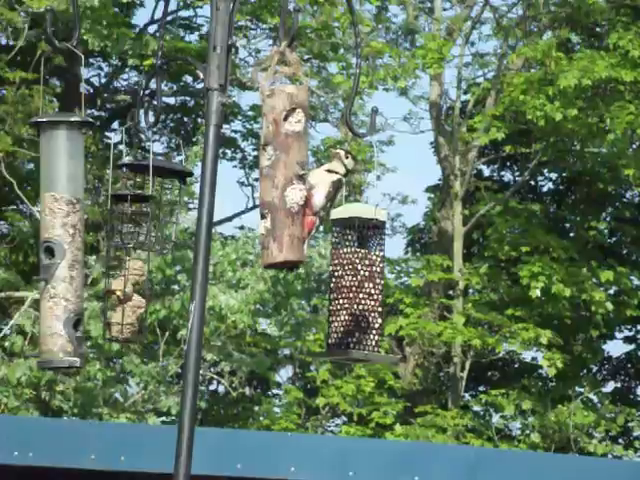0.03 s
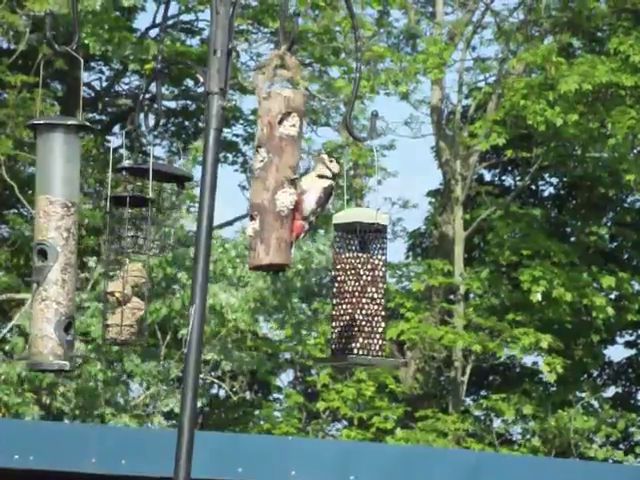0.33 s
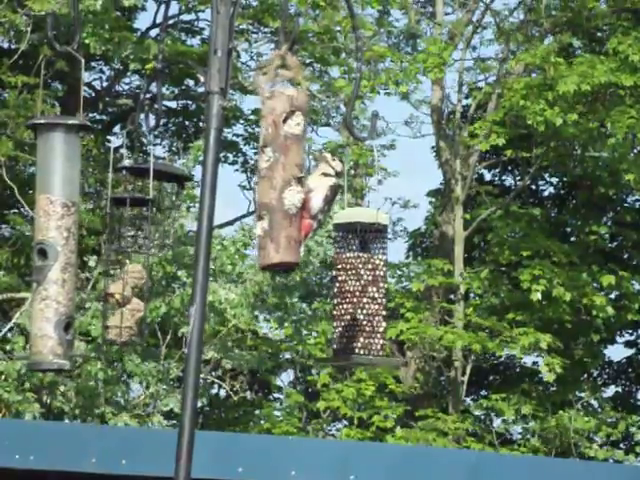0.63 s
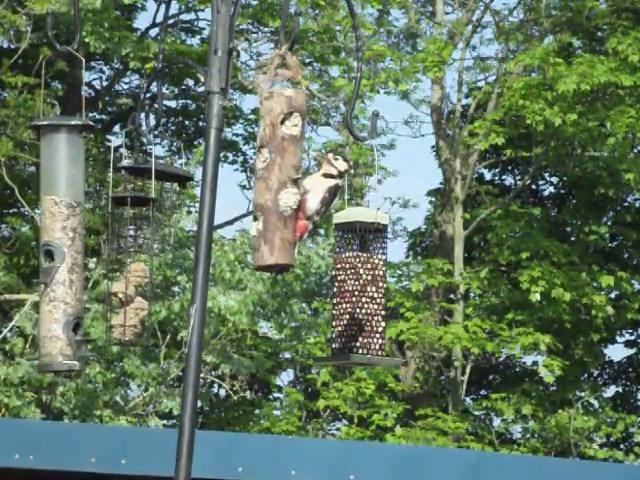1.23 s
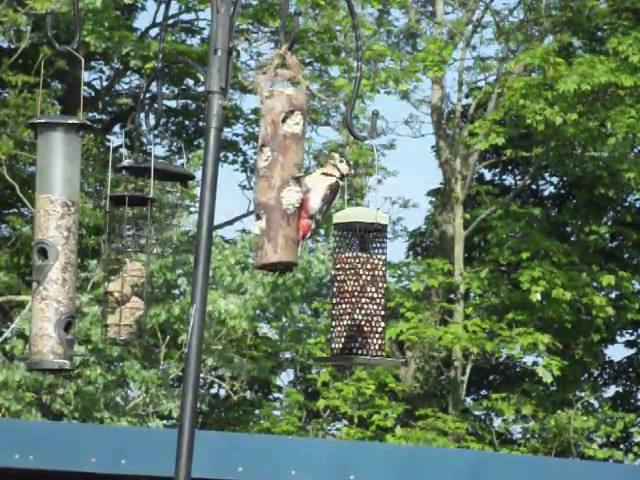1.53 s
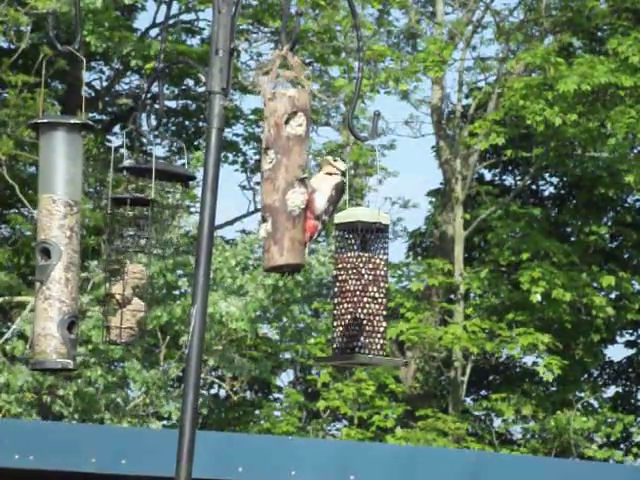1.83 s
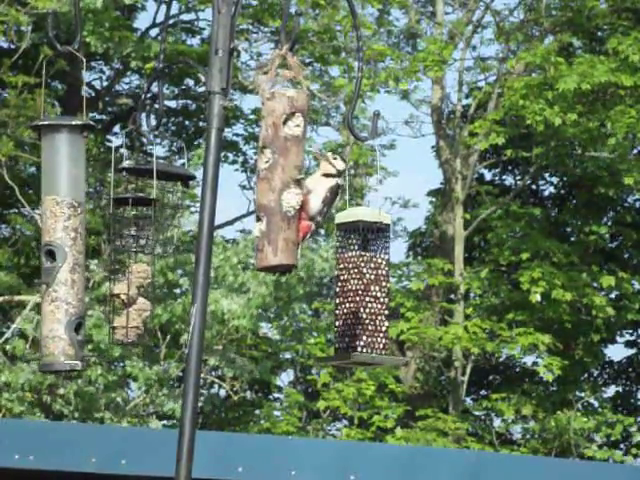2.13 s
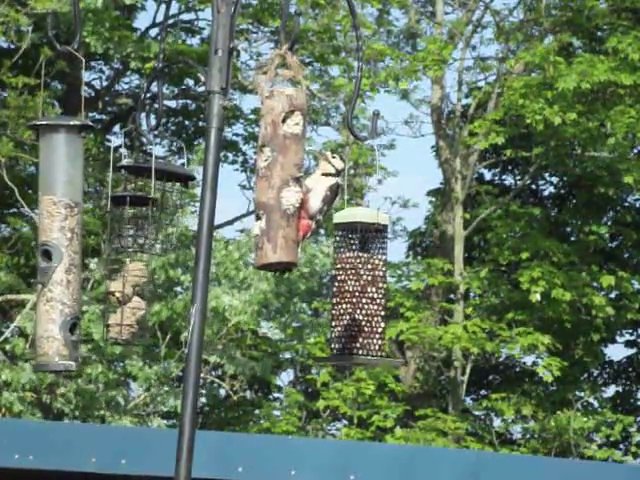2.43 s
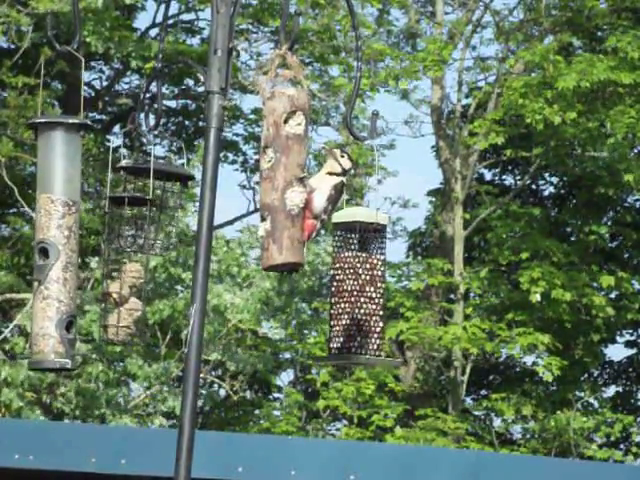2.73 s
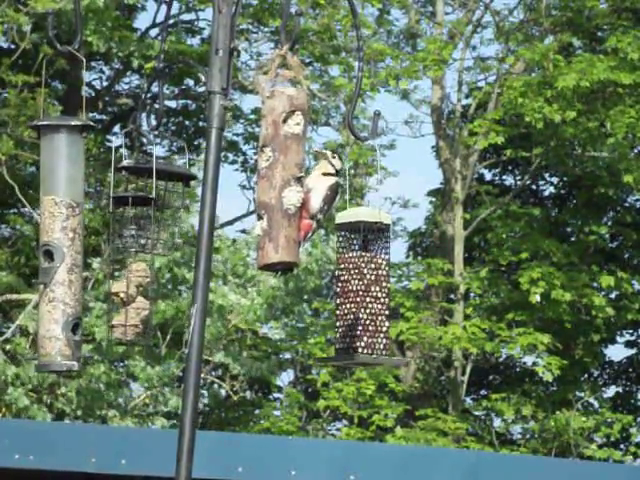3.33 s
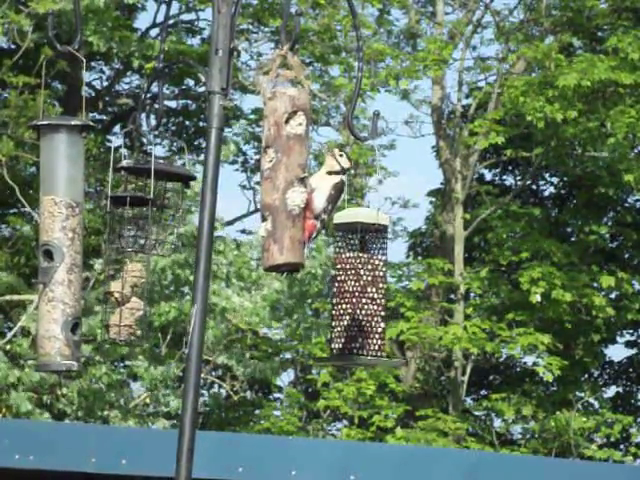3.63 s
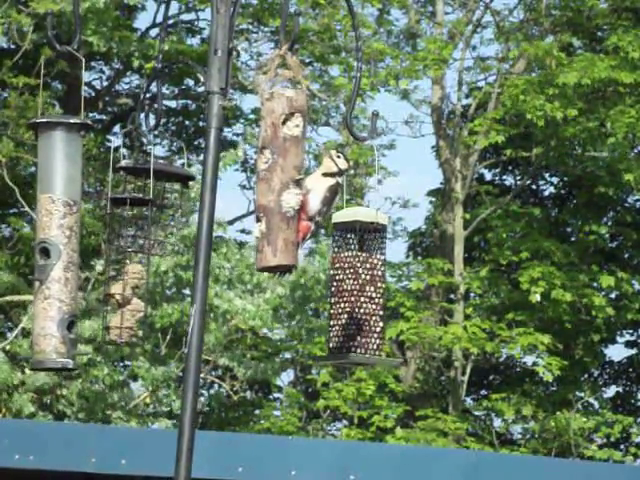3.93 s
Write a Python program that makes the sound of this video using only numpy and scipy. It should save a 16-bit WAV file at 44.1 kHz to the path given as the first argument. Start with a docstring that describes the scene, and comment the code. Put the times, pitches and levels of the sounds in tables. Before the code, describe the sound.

Steady, narrow hiss over a garden bird feeder, with early knocks and faint scratchy ticks.

```python
"""A soft pop and a faint whine as a small camera starts, then knocks and clicks on its plastic body.
Its narrow, ringing hiss covers the scene, a garden bird feeder. Two short runs of dry, scratchy ticks
follow, perhaps pecking: each a scrape ending in a snap. Underneath lie a low outdoor rumble and
a distant engine drone that swells late."""
import sys
import numpy as np
from scipy import signal
from scipy.fft import rfft, irfft
from scipy.io import wavfile
from scipy.ndimage import uniform_filter1d

SR = 44100
rng = np.random.default_rng(int(sys.argv[2]) if len(sys.argv) > 2 else 0)


def wav_record(signal):
    """Record a signal, one row per channel, as 16-bit PCM in the file named by sys.argv[1]."""
    frames = np.transpose(np.atleast_2d(signal))
    bounded = np.clip(frames, -1, 1)
    # unit amplitude maps onto the largest positive 16-bit level
    quanta = np.round(bounded * 32767).astype(np.int16)
    wavfile.write(sys.argv[1], SR, quanta)


N = 176400
TIME_S = np.arange(N) / SR
MIC_ON_S = 0.0362

# outdoor rumble: f/Hz, relative density/dB
RUMBLE_SPECTRUM = [(6, -4), (18, 5.5), (28, -1.5), (38, -11), (48, -13.5), (66, -8), (100, -17.5),
                   (180, -19), (260, -32), (500, -61)]
# engine drone: t/s, level/dB
DRONE_LEVELS = [(0.05, -42), (0.55, -51), (1.05, -45.5), (1.75, -53), (2.45, -53.5), (2.62, -44),
                (3.25, -39.5), (3.95, -45)]
# distant swells: t/s, length/s, f/Hz, width/Hz, level/dB
LOW_SWELLS = [(1.884, .26, 47.2, 8.9, -46), (2.058, 0.18, 158.4, 65, -45), (2.09, .65, 76.7, 19, -47),
              (2.1, 1.0, 145, 70, -55)]
# hiss: f/Hz, relative density/dB
HISS_SPECTRUM = [(120, -39.5), (210, -14), (480, -15), (750, -16), (1150, -13.5), (1700, -11), (2400, -9),
                 (2720, -7.5), (2900, -1), (3350, -0.5), (3600, -8), (3820, -17), (4250, -16),
                 (4550, -14.5), (5100, -22), (5500, -27), (5850, -38), (6150, -53.5), (6500, -75.5)]
# hiss: t/s, level/dB
HISS_LEVELS = [(0.04, -37.5), (0.9, -38), (1.9, -38), (2.8, -37.5), (3.95, -37.5)]
# microphone housing peaks and notches: f/Hz, width/Hz, gain/dB
HOUSING_RESONANCES = [(1168, 27, 3), (1285, 46, -4), (1323, 14, 4.5), (1625, 41, 4.5), (1995, 30, -2.5),
                      (2103, 70, 3.5), (2672, 42, -8), (3016, 70, 3), (3150, 36, -11.5), (3320, 70, 4),
                      (3520, 41, -1), (3604, 34, 4.5), (4053, 36, 7.5), (4200, 120, -3.5)]
# start-up whine: f/Hz, level/dB
WHINE_PARTIALS = [(555, -38.5), (1110, -45.5)]
# camera body: f/Hz, relative level/dB, t60/s
BODY_MODES = [(991, -23.5, 0.027), (1440, -33, 0.0086), (1805, -9, 0.01), (1850, -7, 0.0099),
              (2710, -10, 0.0027), (2998, 6, 0.0072), (3200, -8, 0.0072), (4480, -42, 0.0093),
              (5230, -26, .006)]
# contacts on the body: t/s, ring/dB, thud/dB
BODY_KNOCKS = [(0.0781, -22.5, -23), (0.1771, -21, -16.5), (.1790, -14, -37), (0.1828, -18, -34),
               (0.1851, -16.5, -40), (0.2732, -4.5, -28.5), (0.2755, -5.5, -34)]
# ticks: snap t/s, scrape length/s, scrape/dB, snap/dB, rub/dB
TICK_STROKES = [(0.351, 0.016, -38, -29, -43.5), (0.438, .003, -32, -25, -40.5),
                (.535, .011, -31, -22, -41.5), (.542, 0.0033, -34.5, -22, -46),
                (0.632, 0.0068, -32, -26, -42), (.683, 0.014, -44, -47, -36),
                (.7215, 0.021, -30.5, -16.5, -39.5), (1.0565, 0.0071, -32, -26, -42),
                (1.1474, 0.0074, -32, -24, -39), (1.2385, 0.0026, -31, -22, -42),
                (1.248, .003, -34, -21, -42), (1.3452, 0.0034, -36, -21, -43.5),
                (1.365, 0.014, -35, -18, -41)]
# bright scrape: f/Hz, relative density/dB
SCRAPE_SPECTRUM = [(800, -30), (2500, -12.5), (3000, -2), (3350, 11), (3750, -6.5), (4050, -2.5),
                   (4450, -12.5), (5200, -19.5), (5900, -36), (6400, -65)]
# dull rub: f/Hz, relative density/dB
RUB_SPECTRUM = [(200, -11.5), (700, -15.5), (1100, 0), (1450, -5), (2000, 1.5), (2600, -6.5), (4000, -29),
                (6000, -64.5)]


def amp(db):
    """dB to gain."""
    return 10 ** (np.asarray(db) / 20)


def unit_rms(x):
    """Scale to rms 1."""
    return x / np.sqrt(np.mean(x ** 2) + 1e-20)


def envelope(levels):
    """Per-sample gain from (t/s, level/dB) points."""
    return amp(np.interp(TIME_S, *np.transpose(levels)))


def shaped_noise(spectrum):
    """Noise, rms 1; spectrum interpolated over log frequency."""
    hz, db = np.transpose(spectrum)
    f_hz = np.fft.rfftfreq(N, 1 / SR)
    gain = amp(np.interp(np.log(f_hz + 1), np.log(hz + 1), db))
    return unit_rms(irfft(rfft(rng.standard_normal(N)) * gain, N))


def band_noise(centre_hz, width_hz):
    """Noise, rms 1, in a Gaussian band."""
    f_hz = np.fft.rfftfreq(N, 1 / SR)
    gain = np.exp(-2 * ((f_hz - centre_hz) / width_hz) ** 2)
    return unit_rms(irfft(rfft(rng.standard_normal(N)) * gain, N))


def add(mix, start_s, sound):
    """Mix in place at start_s."""
    part = mix[max(round(start_s * SR), 0):][:len(sound)]
    part += sound[:len(part)]


def outdoor_rumble(bed_db=-43):
    """Steady low noise plus soft, distant narrow-band swells."""
    out = amp(bed_db) * shaped_noise(RUMBLE_SPECTRUM)
    for start_s, length_s, hz, width_hz, db in LOW_SWELLS:
        arch = np.sin(np.pi * np.clip((TIME_S - start_s) / length_s, 0, 1))
        out += amp(db) * arch * band_noise(hz, width_hz)
    return out


def engine_drone(pitch_hz=55.8, wander_rms=0.008):
    """Distant engine: one low, wavering tone."""
    hz = pitch_hz * (1 + wander_rms * band_noise(0, width_hz=4.3))
    return envelope(DRONE_LEVELS) * unit_rms(np.sin(2 * np.pi * np.cumsum(hz) / SR))


def hiss(flicker_db=0.72, patch_s=0.055, patch_hz=350, rise_s=0.017):
    """Hiss ringing in the microphone housing; fades in, flickers slightly in time-frequency patches."""
    f_hz = np.fft.rfftfreq(N, 1 / SR)
    housing_db = sum(db * np.exp(-((f_hz - hz) / width_hz) ** 2)
                     for hz, width_hz, db in HOUSING_RESONANCES)
    ringing = irfft(rfft(shaped_noise(HISS_SPECTRUM)) * amp(housing_db), N)
    bins_hz, frames_s, spectra = signal.stft(ringing, SR, nperseg=1024, noverlap=768)
    patches = uniform_filter1d(rng.standard_normal(spectra.shape), round(patch_hz / bins_hz[1]), axis=0)
    patches = unit_rms(uniform_filter1d(patches, round(patch_s / frames_s[1]), axis=1))
    spectra *= amp(flicker_db * patches)
    flickering = signal.istft(spectra, SR, nperseg=1024, noverlap=768)[1][:N]
    fade_in = np.clip((TIME_S - MIC_ON_S) / rise_s, 0, 1)
    return fade_in * unit_rms(flickering) * envelope(HISS_LEVELS)


def whine(half_length_s=0.03):
    """Faint, brief tone as the camera starts."""
    gate = np.exp(-((TIME_S - MIC_ON_S) / half_length_s) ** 8)
    return gate * sum(amp(db) * np.sin(2 * np.pi * hz * TIME_S) for hz, db in WHINE_PARTIALS)


def knocks(contact_s=0.00095, rattle_db=-16.5, rattle_decay_s=0.0073):
    """Each contact rings and rattles the plastic body; its thud sets the whole camera booming."""
    thud_hz, thud_decay_s = 233, 0.00065
    boom_hz, boom_decay_s, boom_re_thud_db = 116, 0.029, -21
    t = np.arange(SR // 10) / SR
    ring = sum(amp(db - 60 * t / t60_s) * np.sin(2 * np.pi * hz * t) for hz, db, t60_s in BODY_MODES)
    ring *= 1 - np.exp(-(t / contact_s) ** 2)
    ring /= abs(ring).max()
    thud = -np.sin(2 * np.pi * thud_hz * t) * np.exp(1 - t / thud_decay_s)
    boom = amp(boom_re_thud_db) * np.sin(2 * np.pi * boom_hz * t) * np.exp(-t / boom_decay_s)
    out = np.zeros(N)
    for start_s, ring_db, thud_db in BODY_KNOCKS:
        body_noise = unit_rms(signal.fftconvolve(rng.standard_normal(len(t)), ring)[:len(t)])
        rattle = amp(rattle_db) * body_noise * np.exp(-t / rattle_decay_s)  # dB re ring peak
        add(out, start_s, amp(ring_db) * (ring + rattle) + amp(thud_db) * (thud + boom))
    return out


def ticks(release_s=0.006, snap_s=0.00052, snap_hz=3560, grain_db=2):
    """Perhaps pecking: a grainy scrape over a dull rub builds to a tiny snap, then dies away."""
    scrape_gain, rub_gain, snaps = np.zeros((3, N))
    for at_s, length_s, scrape_db, snap_db, rub_db in TICK_STROKES:
        t = TIME_S - at_s
        stroke = np.exp(-np.where(t < 0, (t / length_s) ** 4, t / release_s))
        scrape_gain += amp(scrape_db) * stroke
        rub_gain += amp(rub_db) * stroke
        snaps += amp(snap_db) * np.exp(-(t / snap_s) ** 2) * np.sin(2 * np.pi * snap_hz * t)
    grain = unit_rms(amp(grain_db * band_noise(0, width_hz=800)))
    scrape = scrape_gain * shaped_noise(SCRAPE_SPECTRUM)
    rub = rub_gain * shaped_noise(RUB_SPECTRUM)
    return grain * (scrape + rub) + snaps


def scene():
    """All sources, mono."""
    return (hiss() + engine_drone() + outdoor_rumble() + whine() + knocks() + ticks())[None]


def record(dry, cutoff_hz=6250):
    """Microphone comes on with a soft pop, settles with a slow bump; the camera cuts the treble."""
    pop_db, pop_decay_s = -18.5, 0.03
    bump_db, bump_at_s, bump_rise_s, bump_fall_s = -9, 0.059, 0.014, 0.044
    pop = amp(pop_db) * np.exp(-np.maximum(TIME_S - MIC_ON_S, 0) / pop_decay_s)
    t = TIME_S - bump_at_s
    bump = amp(bump_db) * np.exp(-np.where(t < 0, -t / bump_rise_s, t / bump_fall_s))
    live = (dry - pop - bump) * (TIME_S >= MIC_ON_S)
    lowpass = signal.firwin(511, cutoff_hz, window=("kaiser", 9), fs=SR)
    return signal.oaconvolve(live, lowpass[None], "same")


dry = scene()
out = record(dry)
wav_record(out)
```